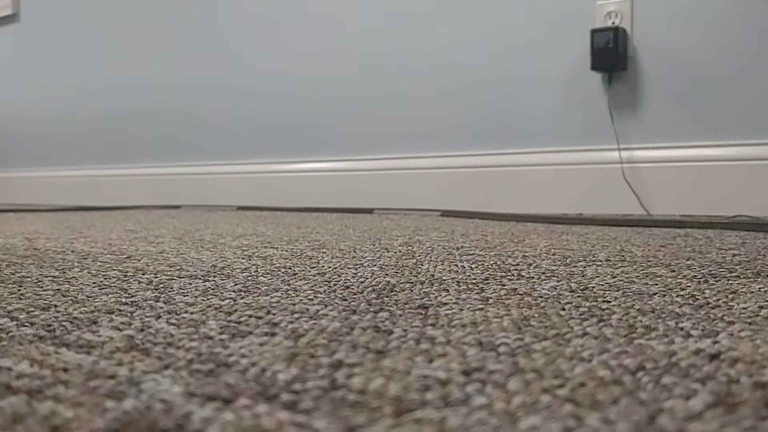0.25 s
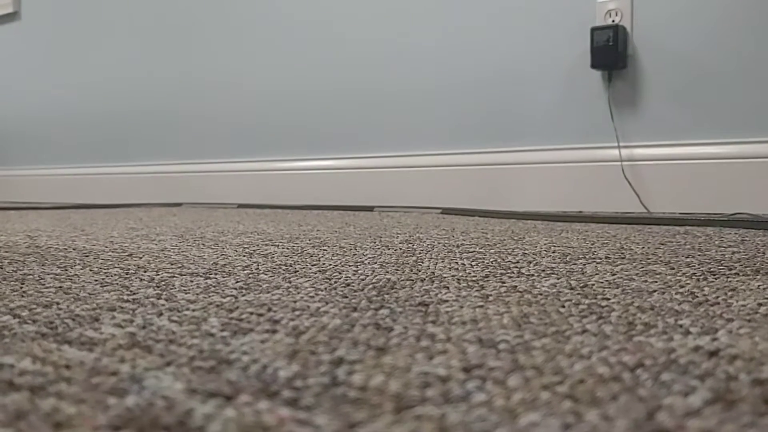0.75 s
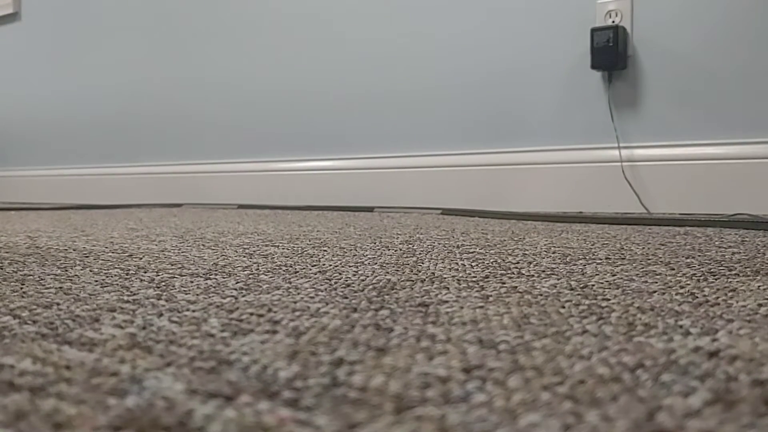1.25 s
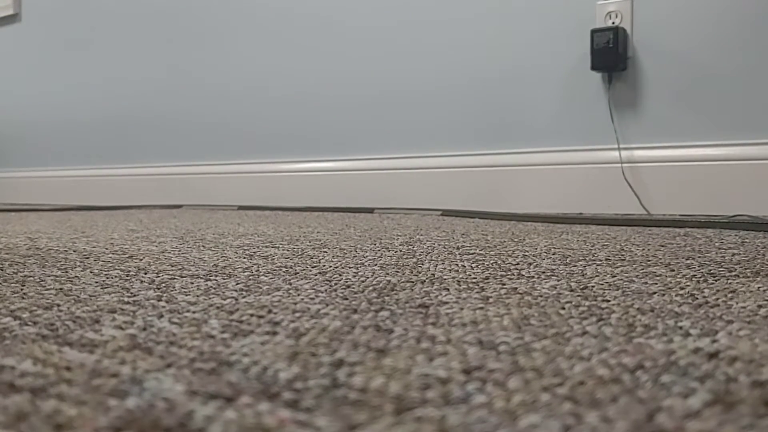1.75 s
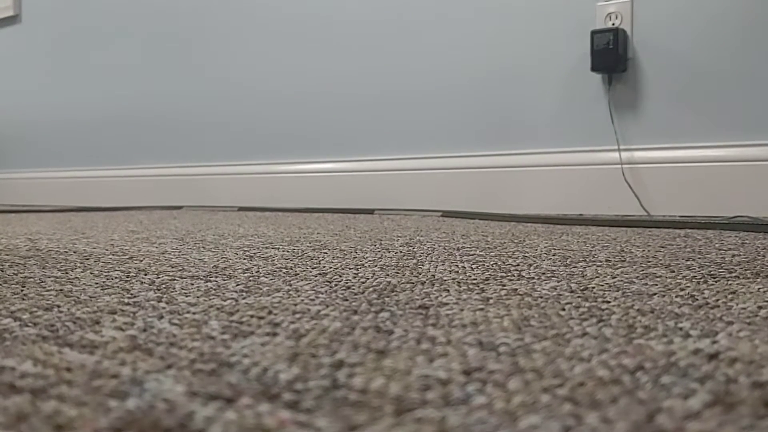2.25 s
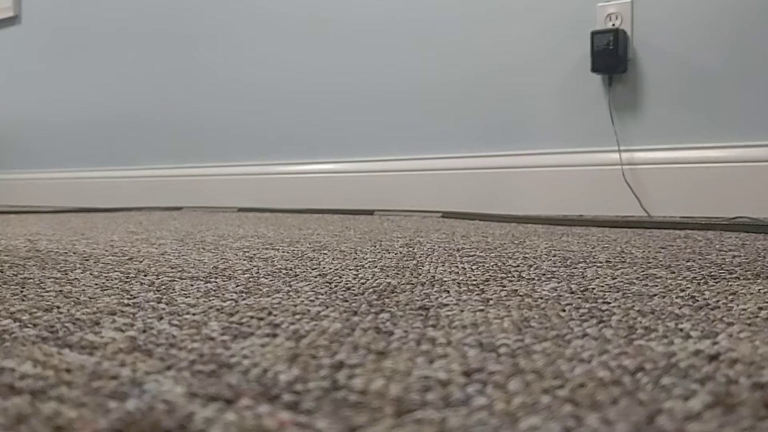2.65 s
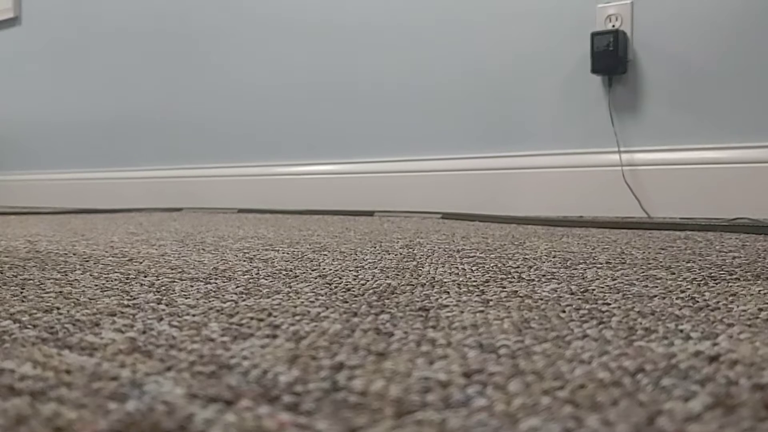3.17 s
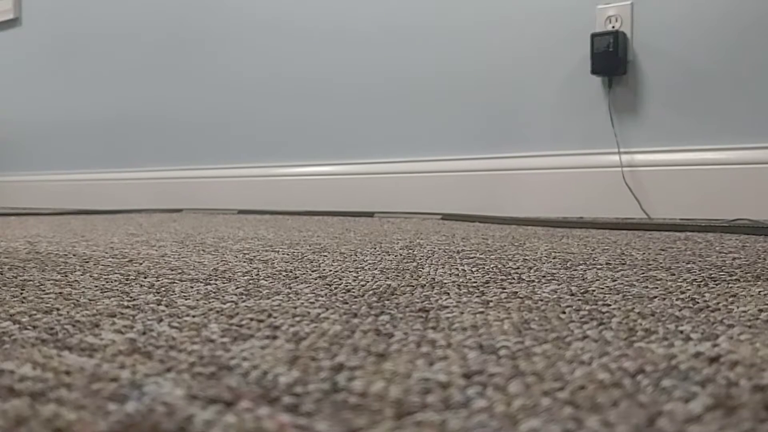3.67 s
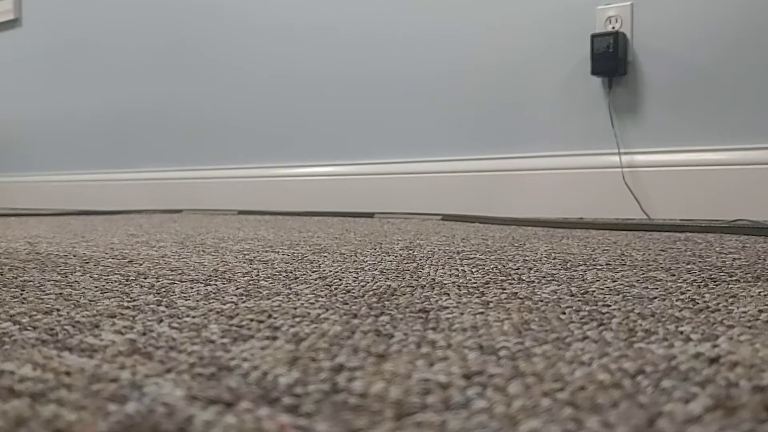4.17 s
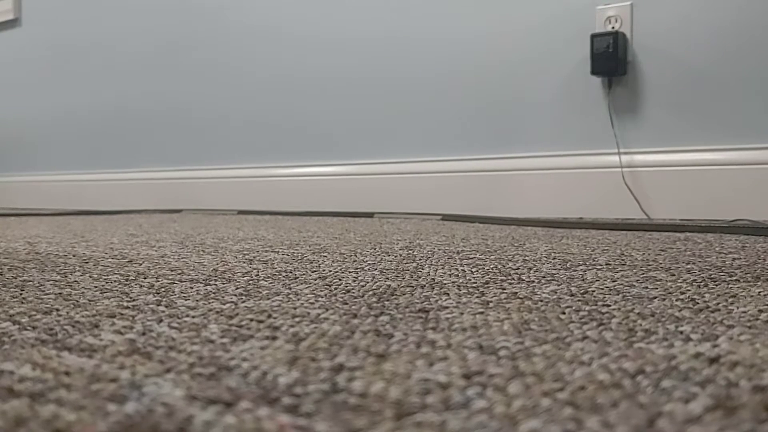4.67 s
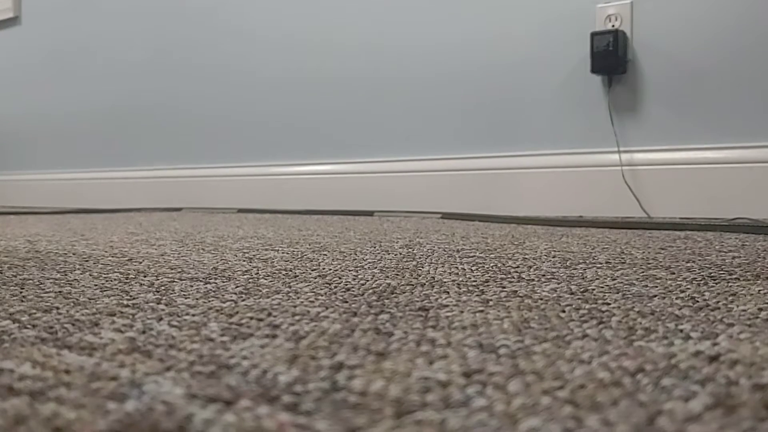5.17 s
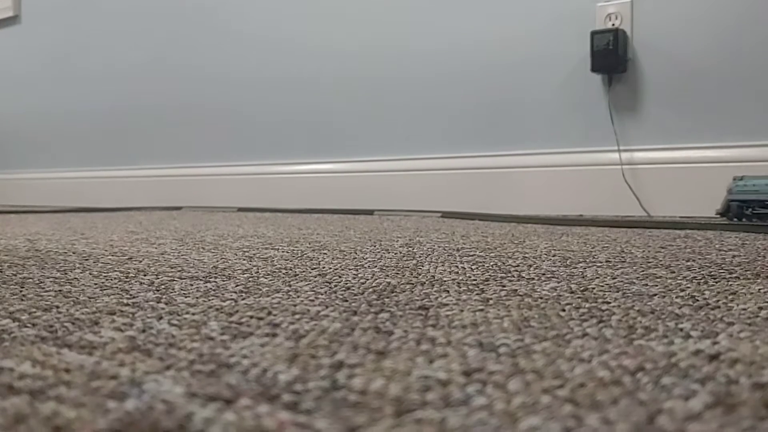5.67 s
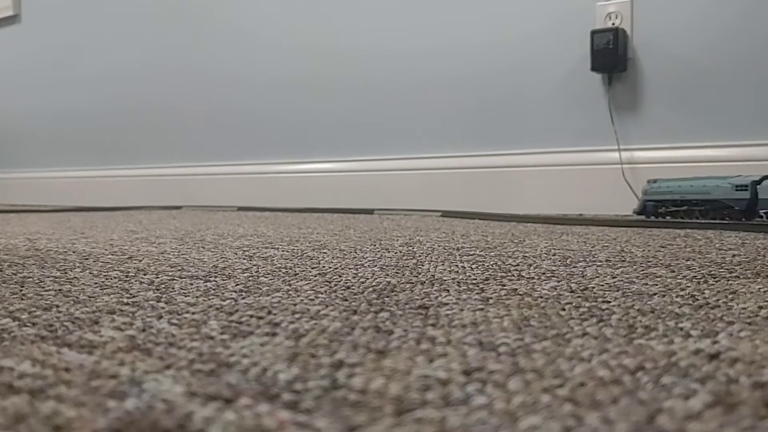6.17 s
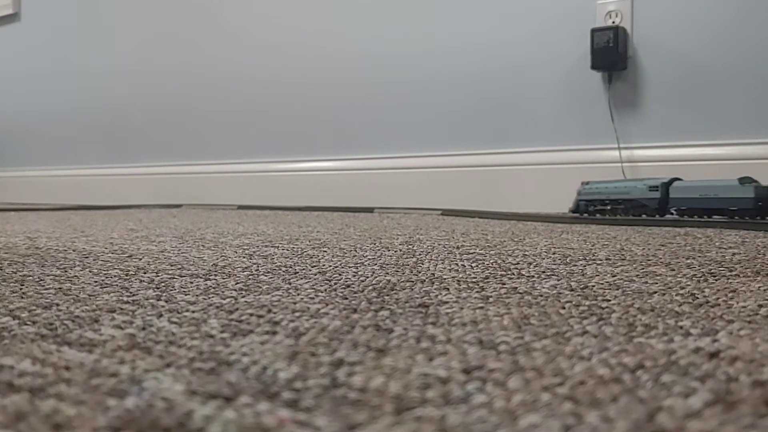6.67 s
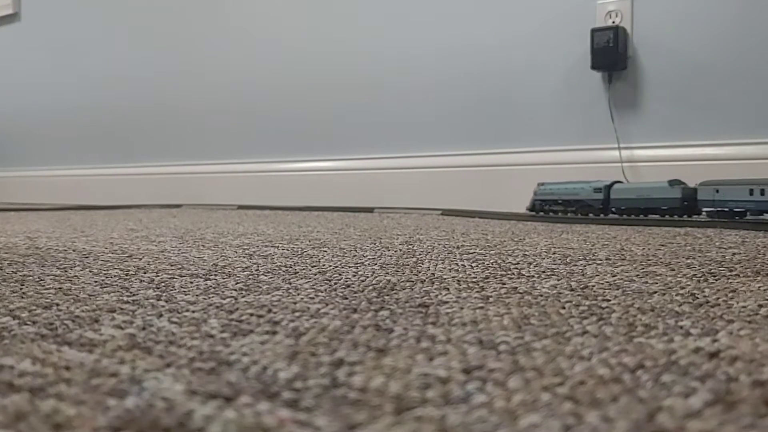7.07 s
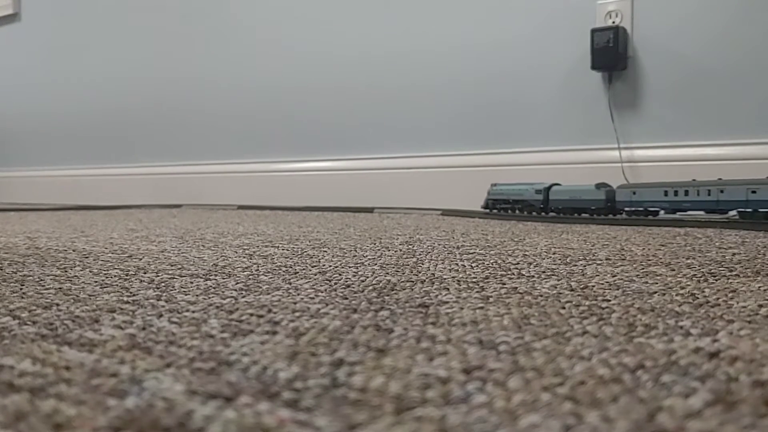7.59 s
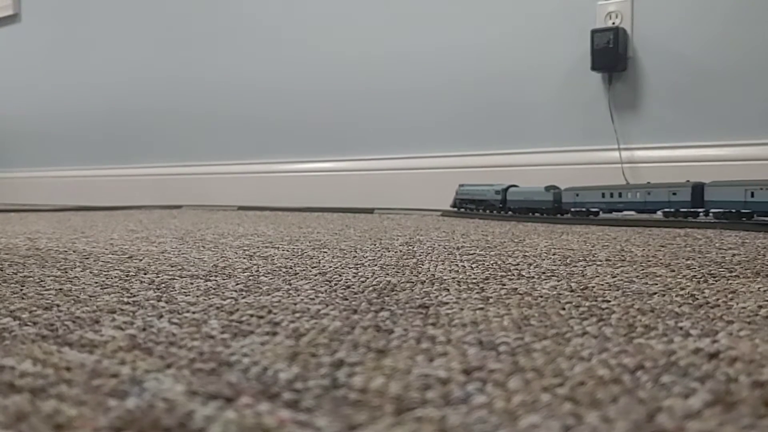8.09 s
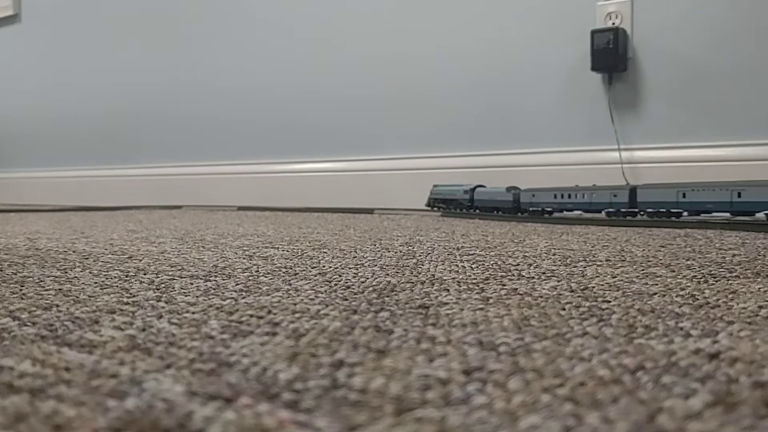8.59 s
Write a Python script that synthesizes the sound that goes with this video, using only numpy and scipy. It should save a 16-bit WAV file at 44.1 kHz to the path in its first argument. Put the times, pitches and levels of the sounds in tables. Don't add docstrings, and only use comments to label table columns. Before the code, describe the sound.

Low stereo microphones near the floor catch a model train running on sectional track. A distant hiss builds quickly to a harsh, grainy rush, brightest on the right, peppered with irregular steel clicks, duller knocks and light plastic bumps. After about four and a half seconds it dulls and recedes, leaving soft rolling, scattered ticks and fluttering high flange squeaks over a barely audible low hum.

```python
import sys
import numpy as np
from scipy import signal
from scipy.fft import rfft, irfft, next_fast_len
from scipy.io import wavfile
from scipy.ndimage import uniform_filter1d, map_coordinates

SR = 44100
rng = np.random.default_rng(int(sys.argv[2]) if len(sys.argv) > 2 else 0)


def output_pcm(signal):
    pcm = np.clip(np.atleast_2d(signal).T, -1, 1) * 32767
    wavfile.write(sys.argv[1], SR, np.round(pcm).astype(np.int16))


def field_ratio(decibels):
    return 10 ** (np.asarray(decibels, dtype=float) / 20)


N = 389844

# t/s, rolling level/dB, clear view of the wheels/dB
ROLLING_LEVEL = [(0.0, -59, -1.5), (0.9, -57.5, -1), (1.26, -54.5, 3.5), (1.6, -51.5, 6.5),
                 (1.99, -47, 6.5), (2.5, -41.5, 4), (2.78, -39, 3), (3.03, -39, 2), (3.4, -42.5, 1.5),
                 (3.85, -40.5, -1), (4.3, -42, -3.5), (4.6, -45, -7.5), (5.02, -45.5, -6),
                 (5.45, -48.5, -9), (6.5, -49.5, -6.5), (7.1, -46.5, -7.5), (7.6, -50, -8.5),
                 (8.2, -49.5, -9.5), (8.84, -55, -6)]
# t/s, body left-right level/dB, fizz left-right level/dB
PORT_PAN = [(0.0, 3.5, -13), (1.55, 7, -8), (1.99, 4, -15), (2.35, 4, -22), (2.73, -0.5, -25.5),
            (3.67, -0.5, -20), (4.05, 0, -15.5), (5.6, -.5, -17), (8.84, -0.1, -19)]
# t/s, nearness/0-1, left port delay/ms
TRAIN_PLACE = [
    (0, 0.34, -0.13),
    (1, 0.25, -0.14),
    (1.8, 0.29, 0.12),
    (2.5, 0.86, 0.45),
    (4, 0.86, 0.5),
    (4.8, 0.62, 0.446),
    (5.5, 0.31, 0.45),
    (8.84, 0.17, 0.44),
]
# low f/Hz, high f/Hz
LEVEL_BANDS = [
    (60, 700),
    (1000, 4400),
    (4400, 7600),
    (9500, 15700),
]
# f/Hz, density level/dB per Hz
NEAR_COLOUR = [(45, -27), (109, -16.5), (426, -19.5), (740, -17), (1250, -17), (2480, -6), (4300, -7.5),
               (5900, -1), (6900, -5), (9000, -6), (10500, -14.5), (13000, -7.5), (15500, -13)]
# f/Hz, density level/dB per Hz
FAR_COLOUR = [(45, -18), (106, -6.5), (160, -14.5), (233, -5.5), (303, -16.5), (554, -11), (1010, -11.5),
              (1810, -4), (3220, -8), (4650, -8.5), (10200, -6.5), (13300, -8), (15700, -16.5)]
# f/Hz, width/Hz, level/dB, loudest t/s, duration/s
CAR_MODES = [(232, 54, 5, 2.6, 6), (960, 51, 13, 1.57, 0.87), (810, 110, 8.5, 2, 0.51),
             (105, 40, 4.5, 4, 9), (1380, 50, 8, 0.54, 3.2), (1795, 500, 3, 5.5, 2.9),
             (3020, 220, 9, 2.4, 0.13), (2840, 270, 8.5, 2.62, 0.2), (3580, 340, 6, 3.05, 0.5),
             (3550, 310, 10.5, 4.43, 0.86), (3650, 250, 6, 8.4, 0.06), (3620, 250, 8, 5.3, 0.14),
             (3610, 300, 4.5, 7.17, 0.29), (3570, 270, 7, 7.1, 0.064), (3600, 250, -3, 7.1, 0.067),
             (4990, 320, 7, 2.45, 0.73), (4760, 320, 5, 3.7, 0.8), (5620, 600, 8.5, 2.62, 0.42),
             (6090, 380, 6.5, 2.1, 1.0), (7230, 290, 5.5, 3.7, 1), (8700, 560, 6.5, 3.43, 0.37),
             (11500, 980, 7.5, 3.67, 0.67), (12900, 1900, 7, 3.6, 0.55)]
# f/Hz, left-right level/dB
PORT_COLOUR = [(60, 2.5), (400, -1), (1000, -1.5), (1800, 3.5), (2700, -1.5), (5000, 5), (7200, 0.5),
               (8500, 2), (10000, 5.5), (11800, -5), (13200, 1), (15500, 1)]
# f/Hz, left-right likeness/0-1
PORT_LIKENESS = [(60, 0.95), (250, 0.92), (600, 0.65), (1500, 0.24), (4000, 0.17), (6400, 0.86),
                 (8000, 0.96), (9500, 0.35), (13000, 0.18)]
# t/s, edge f/Hz, lift level/dB
SIDE_SHELF = [
    (1, 13500, -1),
    (1.6, 13500, 13.5),
    (2.2, 12800, 15),
    (2.7, 11500, 10.5),
    (3.3, 11200, 6),
    (4.3, 11100, 4),
    (4.9, 11000, 0),
]
# t/s, peak level/dB
NEAR_JOINTS = [(1.1219, -35), (1.493, -38), (1.8094, -24.5), (1.8911, -31), (2.1371, -32), (2.2423, -25),
               (2.2952, -24), (2.4359, -32), (2.4898, -27), (2.5761, -21), (2.626, -22), (2.687, -23),
               (2.849, -21), (3.0405, -21), (3.1099, -20), (3.1614, -15.5), (3.2121, -24), (3.285, -26),
               (3.353, -19), (3.494, -24), (3.6057, -25), (3.6385, -16.5), (3.7413, -20), (3.8776, -24),
               (4.2653, -22.5), (4.3705, -25), (4.4079, -30), (4.5162, -29)]
# t/s, peak level/dB
CURVE_JOINTS = [(4.6616, -29), (4.7865, -37), (4.8454, -35), (4.9506, -36), (5.248, -35), (5.5293, -37),
                (5.597, -29), (5.6486, -40), (5.712, -35), (6.0197, -42), (6.2652, -39), (6.327, -40),
                (6.3929, -36), (6.508, -36), (6.6927, -39), (6.754, -39), (6.8039, -35), (6.8647, -28),
                (7.0484, -34), (7.1596, -38), (7.2634, -38), (7.3267, -41), (7.5353, -41), (7.6585, -37),
                (7.9339, -40), (7.9857, -42), (8.0656, -34), (8.2766, -39), (8.3454, -36), (8.4213, -44)]
# f/Hz, level/dB
KNOCK_COLOUR = [(800, -19.5), (1500, -6.5), (3000, -4), (5000, -8), (7000, -30), (10000, -80)]
# t/s, peak level/dB, length/s
SQUEAL_BURSTS = [(5.492, -52, .03), (5.718, -52, .08), (5.81, -47.5, .11), (5.941, -46, .07),
                 (6.04, -41.5, .1), (6.18, -41.5, 0.11), (6.275, -41.5, 0.09), (6.35, -43, .07),
                 (6.48, -43.5, 0.081), (6.602, -46.5, .075), (6.704, -42, 0.027), (6.745, -40, 0.053),
                 (6.806, -47, .05), (7.14, -47, .035), (7.19, -46, .04), (7.235, -41, 0.05),
                 (7.295, -45.5, .04), (7.342, -40.5, .037), (7.803, -47.5, .036), (7.877, -44.5, .095),
                 (8.046, -43, .06), (8.15, -43.5, 0.069), (8.204, -55, .032), (8.263, -49, .03),
                 (8.287, -38, 0.052), (8.33, -51, .04)]
# t/s, peak level/dB, pitch f/Hz
BODY_BUMPS = [(2.62, -56, 885), (2.723, -48, 915), (2.834, -51, 713), (3.163, -49, 718), (3.321, -49, 755),
              (3.503, -58, 435), (3.643, -47, 960), (3.741, -46, 560), (3.878, -56, 980), (4.047, -54, 740),
              (4.142, -63, 680), (4.662, -56, 558), (5.039, -52, 927), (5.154, -49, 827), (5.517, -59, 850),
              (5.596, -51, 717), (5.714, -51, 547), (6.454, -58, 549), (6.755, -50.5, 665),
              (6.985, -50.5, 907), (7.149, -55, 939), (7.32, -52, 880), (7.461, -48.5, 890),
              (7.64, -54, 584), (8.206, -54, 673), (8.804, -55, 720)]
# f/Hz, rms level/dB
HUM_TONES = [
    (118.4, -68.5),
]

RUMBLE_DB, RUMBLE_PER_ROLL_DB, RUMBLE_PER_VIEW_DB = -61, 0.41, 0.055
FIZZ_DB, FIZZ_PER_VIEW_DB, FIZZ_NEAR_DB = -6, 1.31, 10
RUB_DB, RUB_S = 2.5, 0.11
TICK_DB, KNOCK_DB = -1, 7
AXLE_GAP_S, AXLE_SCATTER = 0.062, 0.4
SMALL_TICK_DB, SMALL_SPREAD_DB = 12, 2.5
MASKED_DB = 7.5
TAIL_DB, TAIL_S = -19, 0.01
SQUEAL_HZ, SQUEAL_HZ_PER_DB, SAG_HZ_PER_S = 8030, 3.5, 28


def unit(x):
    return x / np.sqrt(np.mean(x ** 2) + 1e-20)


def along(points, hz):
    f, v = np.transpose(points)
    return np.interp(np.log(hz + 1), np.log(f + 1), v)


def curves(rows, t_s):
    knots_s, *columns = np.transpose(rows)
    return [np.interp(t_s, knots_s, column) for column in columns]


def wobble(rate_hz):
    knots = rng.standard_normal(int(N * rate_hz / SR) + 4)
    return map_coordinates(knots, [np.arange(N) * rate_hz / SR])


def filtered(x, response):
    size = next_fast_len(N + 8192)
    hz = np.fft.rfftfreq(size, 1 / SR)
    return irfft(rfft(x, size) * response(hz), size)[..., :N]


def across(values, knots_hz, hz):
    total = 0
    for pick, value in zip(np.eye(len(values)), values):
        total = total + along(list(zip(knots_hz, pick)), hz)[:, None] * value
    return total


def levels(t_s):
    roll_db, view_db = curves(ROLLING_LEVEL, t_s)
    rub = 0
    for start_s, db, length_s in SQUEAL_BURSTS:
        rub = rub + field_ratio(db + 38) * np.exp(-((t_s - start_s - length_s / 2) / RUB_S) ** 2)
    view_db = view_db + RUB_DB * rub
    near = curves(TRAIN_PLACE, t_s)[0]
    rumble_db = RUMBLE_DB + RUMBLE_PER_ROLL_DB * (roll_db + 49) + RUMBLE_PER_VIEW_DB * view_db
    fizz_db = roll_db + FIZZ_DB + FIZZ_PER_VIEW_DB * view_db + FIZZ_NEAR_DB * near
    return rumble_db, roll_db, roll_db + view_db, fizz_db


def rolling_colour_db(hz, t_s, near):
    colour_db = np.outer(along(NEAR_COLOUR, hz), near) + np.outer(along(FAR_COLOUR, hz), 1 - near)
    for mode_hz, width_hz, db, peak_s, lasts_s in CAR_MODES:
        resonance = np.exp(-(2 * (hz - mode_hz) / width_hz) ** 2)
        facing = np.exp(-((t_s - peak_s) / lasts_s) ** 4)
        colour_db += db * np.outer(resonance, facing)
    edge_hz, shelf_db = curves(SIDE_SHELF, t_s)
    colour_db += shelf_db / (1 + np.exp((edge_hz - hz[:, None]) / 200))
    patches = uniform_filter1d(rng.standard_normal(colour_db.shape), 9, 0)
    patches = uniform_filter1d(patches, 6, 1)
    return colour_db + 1.6 * unit(patches) * (hz > 1200)[:, None]


def rolling():
    grit = unit(field_ratio(1.25 * wobble(9) + 1.26 * wobble(40) + 1.7 * wobble(500)))
    noise = rng.standard_normal((2, 3, N))
    hz, t_s, smooth = signal.stft(noise[0], SR, nperseg=1024)
    gritty = signal.stft(noise[1] * grit, SR, nperseg=1024)[2]
    grit_points = [(200, 0), (700, 0.23), (1500, 0.1), (5000, 0.53), (12000, 0.74)]
    share = np.clip(along(grit_points, hz), 0, 1)[:, None]
    shared, left, right = np.sqrt(1 - share) * smooth + np.sqrt(share) * gritty

    near, lag_ms = curves(TRAIN_PLACE, t_s)
    colour_db = rolling_colour_db(hz, t_s, near)
    lift_db = []
    for (low_hz, high_hz), db in zip(LEVEL_BANDS, levels(t_s)):
        inside = (hz > low_hz) & (hz < high_hz)
        power = field_ratio(2 * colour_db[inside]).sum(0) / len(hz)
        lift_db.append(db - 10 * np.log10(uniform_filter1d(power, 30)))
    lift_knots_hz = [60, 600, 1100, 4000, 4800, 7000, 9000, 15700]
    gain = field_ratio(colour_db + across(np.repeat(lift_db, 2, 0), lift_knots_hz, hz))

    body_pan_db, fizz_pan_db = curves(PORT_PAN, t_s)
    pans_db = [0 * t_s, body_pan_db, body_pan_db, fizz_pan_db]
    pan_db = along(PORT_COLOUR, hz)[:, None] + across(pans_db, [400, 1000, 7000, 9500], hz)
    alike = np.clip(along(PORT_LIKENESS, hz), 0, 1)[:, None]
    lag_share = along([(250, 0.3), (700, 1), (4600, 1), (5600, 0)], hz)
    phase = 2 * np.pi * np.outer(hz * lag_share, lag_ms / 1000)
    common, own = np.sqrt(alike) * shared, np.sqrt(1 - alike)
    left = field_ratio(pan_db / 2) * (common * np.exp(-1j * phase) + own * left)
    right = field_ratio(-pan_db / 2) * (common + own * right)
    centre = np.sqrt(field_ratio(pan_db) + field_ratio(-pan_db) + 2 * alike * np.cos(phase)) / 2
    return signal.istft(gain / centre * np.array([left, right]), SR, nperseg=1024)[1][:, :N]


def wheels():
    chance = rng.standard_normal((150, 3))
    small_s = (np.arange(150) + AXLE_SCATTER * chance[:, 0] + 2) * AXLE_GAP_S
    small_near = curves(TRAIN_PLACE, small_s)[0]
    small_db = levels(small_s)[3] + SMALL_TICK_DB - MASKED_DB * small_near + SMALL_SPREAD_DB * chance[:, 1]
    clear_s, clear_db = np.transpose(list(NEAR_JOINTS) + list(CURVE_JOINTS))
    clear_db = clear_db + TICK_DB - 0.3 * MASKED_DB * curves(TRAIN_PLACE, clear_s)[0]
    hit_s = np.append(clear_s, small_s)
    tick_db = np.append(clear_db, small_db)
    knock_db = levels(hit_s)[1] + KNOCK_DB + np.append(0 * clear_s, 2 * chance[:, 2] - 3)
    return [row for row in zip(hit_s, tick_db, knock_db) if row[0] < N / SR]


def joints():
    t_s = np.arange(SR // 25) / SR
    tick_shape = np.minimum(t_s / 0.0006, 1) * (np.exp(-t_s / 0.0017) + field_ratio(TAIL_DB) * np.exp(-t_s / TAIL_S))
    knock_shape = t_s / 0.0033 * np.exp(1 - t_s / 0.0029)
    tick, knock = np.zeros((2, N + len(t_s)))
    for hit_s, tick_db, knock_db in wheels():
        at = round(hit_s * SR)
        tick[at:][:len(t_s)] += field_ratio(tick_db + 5) * tick_shape
        knock[at:][:len(t_s)] += field_ratio(knock_db) * knock_shape
    steel_points = [(4000, -25), (6000, -4), (10000, -3.5), (13000, 5.5), (15500, 0.5)]
    steel = unit(filtered(rng.standard_normal((2, N)), lambda hz: field_ratio(along(steel_points, hz))))
    track = unit(filtered(rng.standard_normal((2, N)), lambda hz: field_ratio(along(KNOCK_COLOUR, hz))))
    return field_ratio([[-22], [-1]]) * steel * tick[:N] + field_ratio(-4) * track * knock[:N]


def bumps():
    out = np.zeros((2, N + SR))
    t_s = np.arange(SR // 8) / SR
    swell = t_s / 0.005 * np.exp(1 - t_s / 0.0069)
    for start_s, db, pitch_hz in BODY_BUMPS:
        jitter_hz = 2200 * uniform_filter1d(rng.standard_normal((2, len(t_s))), 60, 1)
        turns = np.cumsum(pitch_hz + jitter_hz, 1) / SR
        out[:, round(start_s * SR):][:, :len(t_s)] += field_ratio(db - 1) * swell * np.sin(2 * np.pi * turns)
    return out[:, :N]


def squeal():
    out = np.zeros(N + SR)
    flutter = field_ratio(3.5 * wobble(120) + 2.5 * wobble(40))
    drift_hz = 45 * wobble(140)
    for start_s, db, length_s in SQUEAL_BURSTS:
        mode_hz = SQUEAL_HZ + SQUEAL_HZ_PER_DB * (db + 44) - SAG_HZ_PER_S * (start_s - 6)
        at = slice(round((start_s - 0.01) * SR), round((start_s + length_s + 0.0073) * SR))
        size = at.stop - at.start
        swell = np.hanning(size) ** 0.4 * np.linspace(1.15, 0.7, size)
        tone = np.sin(2 * np.pi * np.cumsum(mode_hz + drift_hz[at]) / SR)
        out[at] += field_ratio(db - 4) * swell * flutter[at] * tone
    return out[:N] * field_ratio([[-0.5], [0.5]])


def hum():
    out = np.zeros(N)
    for tone_hz, db in HUM_TONES:
        level = field_ratio(db + 2.4 * wobble(13))
        out += level * np.sin(2 * np.pi * np.cumsum(tone_hz + 9 * wobble(22)) / SR)
    return out


def scene():
    return rolling() + joints() + bumps() + squeal() + hum()


def top_cut(x):
    return signal.sosfilt(signal.butter(12, 16050, fs=SR, output="sos"), x)


def record(dry):
    band_points = [(25, -17), (42, -9), (52, -0.5), (15750, 0), (15950, -48)]
    mix = filtered(dry, lambda hz: field_ratio(along(band_points, hz)))
    return top_cut(mix)


dry = scene()
out = record(dry)
output_pcm(out)
```